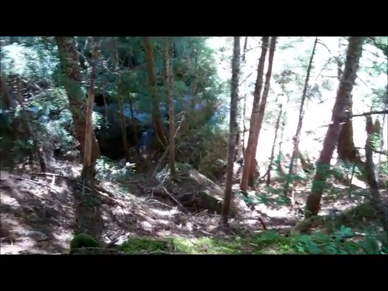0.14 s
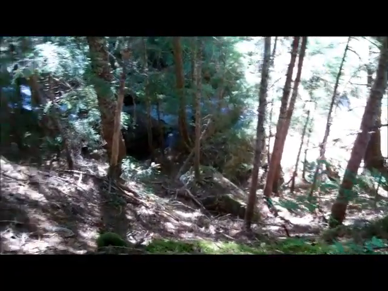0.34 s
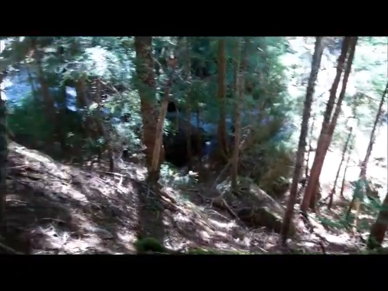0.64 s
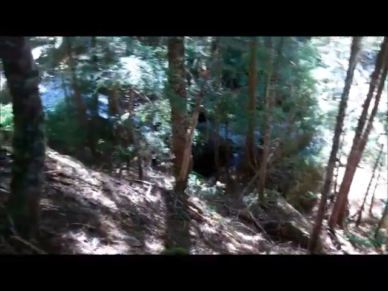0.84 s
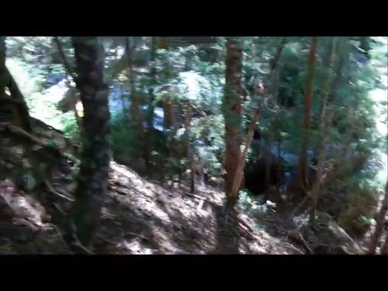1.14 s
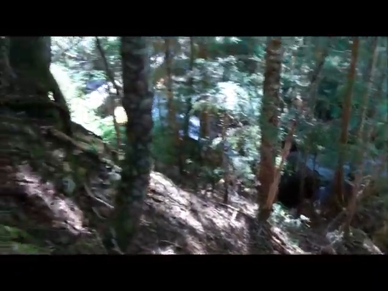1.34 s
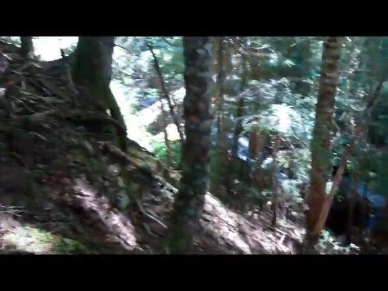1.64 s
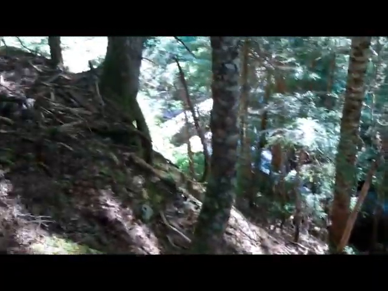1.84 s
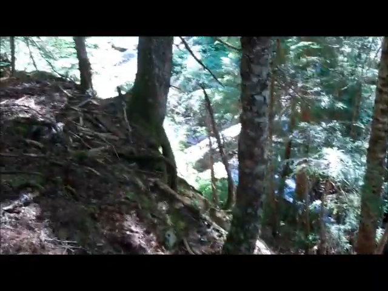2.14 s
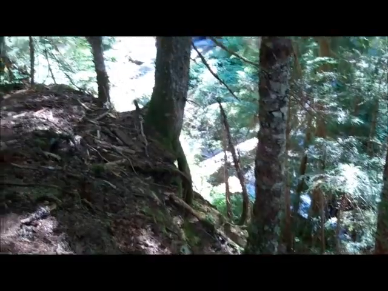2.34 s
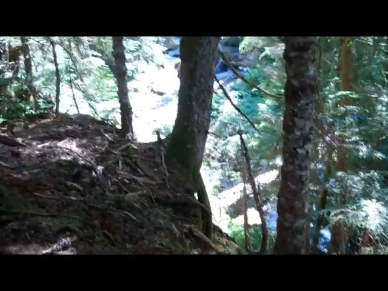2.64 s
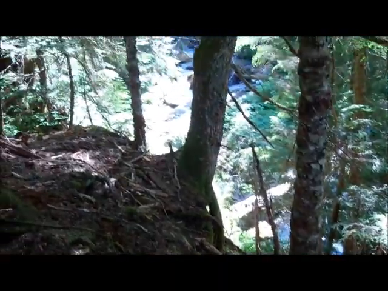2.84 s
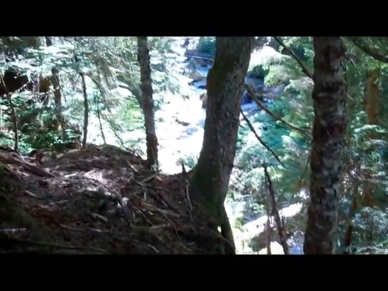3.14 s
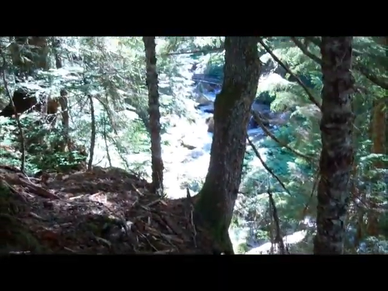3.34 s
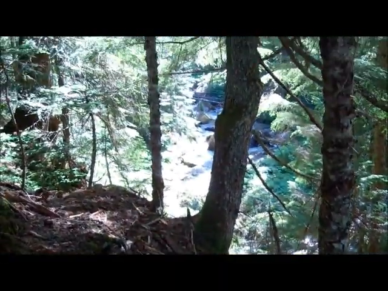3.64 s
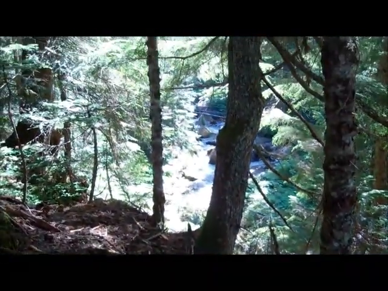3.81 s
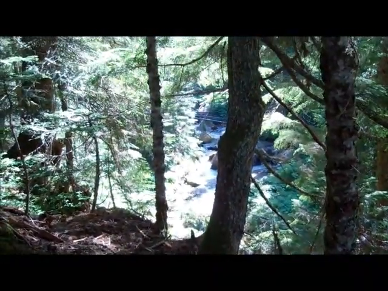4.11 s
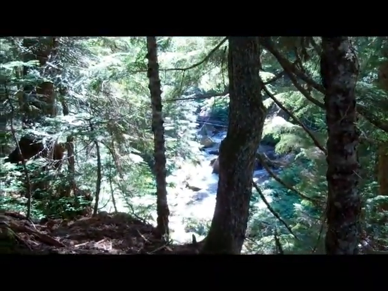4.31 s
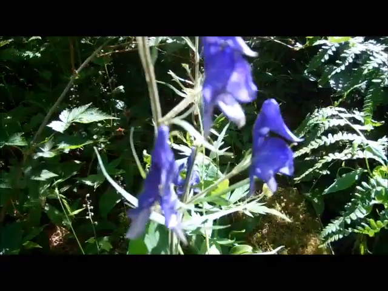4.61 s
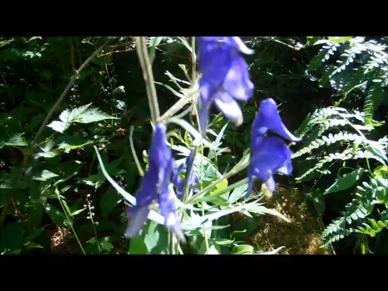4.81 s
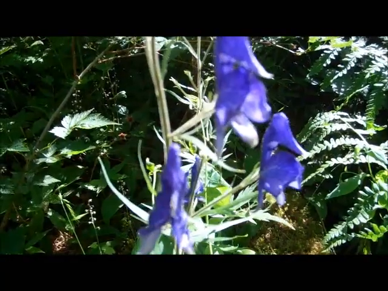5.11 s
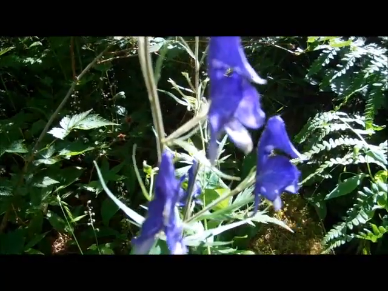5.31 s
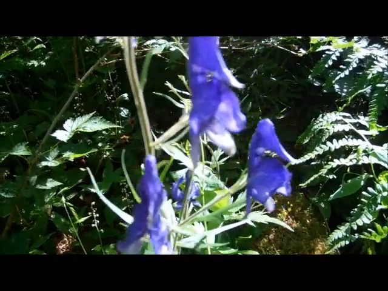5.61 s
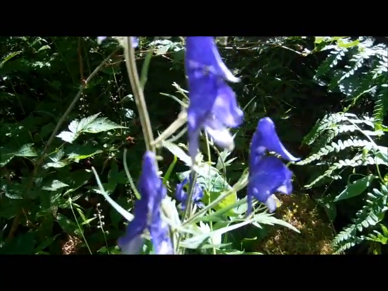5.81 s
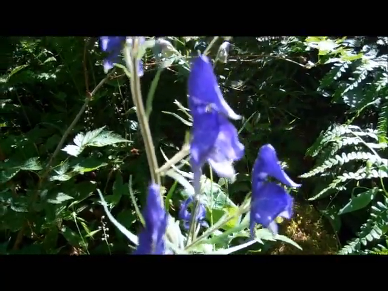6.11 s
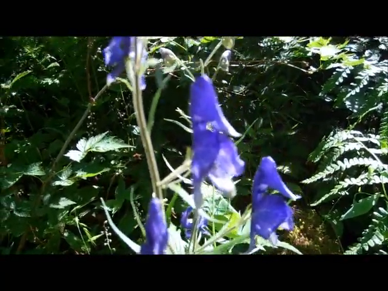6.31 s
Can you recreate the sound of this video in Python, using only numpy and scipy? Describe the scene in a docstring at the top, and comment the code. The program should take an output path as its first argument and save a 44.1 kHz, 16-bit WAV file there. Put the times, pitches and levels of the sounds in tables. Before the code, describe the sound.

A loud mountain stream rushes and gurgles close by, stops after a tiny tick, then returns as a distant, quieter, duller hiss.

```python
"""Mountain stream, near and far

A stream rushes over rocks below a wooded bank, heard on two close microphones as a small camera turns.
Wavering noise bands make the wash; chirping sine rings make its pools, bubbles and crackling spray.
Trees scatter the sound, slight swells of hiss hide within the rush, and air bumps the microphones.
The near shot drops away to silence; a second shot hears the water from far off, quieter and duller.
"""
import sys
import numpy as np
from scipy import signal
from scipy.fft import rfft, irfft
from scipy.io import wavfile
from scipy.ndimage import map_coordinates

SR = 44100
rng = np.random.default_rng(int(sys.argv[2]) if len(sys.argv) > 2 else 0)


def materialize(psi):
    """Save the field psi as 16-bit PCM at rate SR to the path in sys.argv[1].

    A 1-D psi becomes a single channel; in a 2-D psi each row is a channel.
    """
    bounded = np.clip(np.atleast_2d(psi).T, -1, 1)
    quanta = np.round(bounded * 32767).astype(np.int16)
    wavfile.write(sys.argv[1], SR, quanta)


N = 284886
T = np.arange(N) / SR  # seconds
HZ = np.arange(N // 2 + 1) * SR / N + 1e-3  # kept above zero for the logarithms

# Colour of the water from the bank and from far off. Each row: frequency in Hz, relative level in dB per Hz.
NEAR_COLOUR = [(45, -17.5), (90, -8), (150, -9.5), (220, -6.5), (300, -6), (360, -7.5), (480, -1.2),
               (570, -0.05), (700, -2), (920, -3), (1200, -2.5), (1800, -4), (3000, -5.5), (4000, -7),
               (6000, -9.5), (8000, -13), (10000, -16.5), (12000, -28.5), (14000, -41.5)]
FAR_COLOUR = [(25, -4), (70, -0.5), (125, -3), (210, -7), (300, -4), (460, -4), (620, -0.1), (900, -1.8),
              (1100, -0.8), (1400, -2.5), (2500, -3.5), (4000, -5.5), (6000, -10.5), (8000, -16),
              (10000, -21), (12000, -35), (13500, -53)]
# Power that arrives straight from the water. Each row: frequency in Hz, share from 0 to 1.
NEAR_DIRECT = [(100, 0.9), (600, 0.95), (1300, 0.67), (4000, 0.56), (7000, 0.49), (10000, 0.2),
               (13000, 0.04)]
FAR_DIRECT = [(100, 0.13), (2000, 0.25), (4500, 0.16), (7000, .36), (10000, 0.34), (13000, .2)]
# The left microphone port is mostly brighter, most of all near 9 kHz.
# Each row: frequency in Hz, left minus right in dB.
NEAR_BALANCE = [(100, 0.5), (900, 0.6), (2500, 1.6), (5000, 2), (7500, 3.5), (9400, 8.5), (10500, 4.5),
                (12300, 0)]
FAR_BALANCE = [(100, 0.5), (2500, 0.5), (5000, -.4), (7500, 2.7), (9400, 7.5), (10500, 1), (12300, -.3)]
# Change of colour once the camera has turned. Each row: frequency in Hz, change in dB.
TURN_COLOUR = [(100, 0), (165, 1.3), (230, -1), (330, 2), (500, -1.15), (620, 0.66), (900, 0.8), (1200, -1),
               (1700, 0.07), (4000, -0.26), (5700, 1), (8000, -.5), (12000, 0.5)]
# Surging and easing of the white water. Each row: time in seconds, rise in dB.
FLOW = [(0, 1), (.28, 2), (.6, 2), (.73, 2), (.82, 0), (.98, 0), (1.2, 2), (1.62, 2.6), (1.8, 2), (2.0, 2),
        (2.26, .5), (2.7, 1.7), (3.05, 1.7), (3.28, 0), (3.55, 0), (4.03, 2), (4.35, 1.6), (4.6, 1.2)]
# Low churning under the rush. Each row: time in seconds, rise in dB.
CHURN = [(0, 1.5), (.3, -2.5), (.68, .3), (.91, -0.5), (1.04, 2.5), (1.2, -0.5), (1.65, -3.5), (1.82, 0),
         (2.15, 0), (2.4, 0.7), (2.75, -1), (2.88, 1), (3.17, -1), (3.29, -4), (3.42, 2.5), (3.95, -1.5),
         (4.17, 2), (4.3, 0), (4.6, 0)]
# Gulps (+) and lulls (-) of the near and the far pools. Each row: middle in seconds, rise in dB.
NEAR_GULPS = [(.07, -2.5), (.3, 3.5), (.45, 2.5), (.58, 4.5), (1.72, 2), (1.98, 1), (2.23, -5), (2.75, -4),
              (3.0, 2), (3.33, 0.5), (3.72, 3), (3.81, -5), (4.03, 1.5)]
FAR_GULPS = [(4.85, 1), (5.0, 1), (5.1, -1), (5.27, 0), (5.39, -0.5), (5.53, 2.2), (5.72, -1.8), (6.0, -.8)]
# Slight swells of hiss within the rush. Each row: peak in seconds, level in dB, centre in Hz.
HISS_SWELLS = [(.114, -41, 2300), (.407, -42, 2500), (1.215, -40.5, 2500), (1.654, -37, 2400),
               (1.986, -37, 1500), (3.268, -41, 2400)]
# Air bumping the microphones. Each row: middle in seconds, level at the right port in dB,
# half-width in seconds.
PUFFS = [(0.072, -37.5, 0.026), (0.697, -49, 0.046), (1.03, -44, 0.06)]
# Colour of that air. Each row: frequency in Hz, relative level in dB per Hz.
PUFF_COLOUR = [(20, 1), (60, 0), (125, 2), (240, -15), (500, -30), (2000, -80)]
# How the near shot falls away. Each row: start in seconds, step down in dB, further fall in dB per second.
DROPS = [(4.589, 5.5, 108), (4.645, 17, 601)]

NEAR_DB, FAR_DB = -32.5, -45  # base level of the stream in each shot
SILENT_S, SECOND_SHOT_S = 4.68, 4.7015
# Lag of the left port behind the right; the turn moves it steadily
LAG_BEFORE_MS, LAG_AFTER_MS, FAR_LAG_MS = -0.024, 0.037, 0.099
TURN_START_S, TURN_END_S = 0.32, 2.13
SHIFT_START_S, SHIFT_END_S = 1.3, 2.9  # slow shift of colour
PORT_GAP_M, SOUND_M_PER_S = 0.037, 343
CHURN_HZ, POOLS_HZ, FAR_POOLS_HZ = 240, 550, 850
POOLS_DRIFT_OCTAVES, POOLS_DRIFT_PER_S = 0.17, 7  # the gurgle wanders in pitch
GURGLE_DB, GURGLE_WANDER_DB, GURGLE_PER_S, SPRAY_DB = 2.13, 0.14, 6.5, 0.8
POOLS_LAG, SPRAY_LAG = 0.79, 0.31  # dB by which each falls behind per dB of surge
GULP_HALF_S = 0.025
CLUSTER_DB, CLUSTERS_PER_S = 1.23, 22  # bubbles come in clusters
BUBBLE_ATTACK_CYCLES = 0.6
HISS_RISE_S, HISS_OCTAVES = 0.0048, 1.2
DRAUGHT_DB, PUFF_LEFT_DB = -63, -17  # faint eddies between puffs; the left port is sheltered
THUMP_S, THUMP_DB, THUMP_HZ, THUMP_HALF_S = 0.078, -35.5, 121, 0.0088
CLICK_S, CLICK_DB, CLICK_HZ, CLICK_HALF_S = 4.5866, -16.5, 2700, 0.00024
RUMBLE_CUT_HZ, TOP_HZ = 18, 14000


def undb(db):
    """Decibels to gain."""
    return 10 ** (np.asarray(db) / 20)


def across(points):
    """Table values joined by straight lines on a log-frequency axis."""
    hz, value = np.transpose(points)
    return np.interp(np.log(HZ), np.log(hz), value)


def over_time(points):
    """Table values joined by straight lines in time."""
    return np.interp(T, *np.transpose(points))


def octave_bell(centre_hz, octaves, hz=HZ):
    """A bell curve on a log-frequency axis, 1 at its centre."""
    return np.exp(-(np.log2(hz / centre_hz) / octaves) ** 2)


def time_bell(age, half_s):
    """A bell curve in time, 1 at age zero."""
    return np.exp(-0.5 * (age / half_s) ** 2)


def walk(rate):
    """Random levels, rate of them per second, joined by straight lines."""
    knots = rng.standard_normal(1024)
    return 0.92 * np.interp(T * rate, np.arange(len(knots)), knots)


def gulps(table):
    """Level of the pools in dB: each gulp or lull comes and goes like a bell curve."""
    return sum(rise_db * time_bell(T - s, GULP_HALF_S) for s, rise_db in table)


def wash(surge_db, flicker_db, churn_db, gurgle_db, gurgle_hz, spray_db):
    """Three unrelated noises for countless bubbles; octave bands waver together and flicker alone."""
    white = rfft(rng.standard_normal((3, N)))
    centres = 125 * 2.0 ** np.arange(8)
    surge = surge_db * (walk(9) + 0.64 * walk(27.9))
    out = 0
    for hz, pick in zip(centres, np.eye(len(centres))):
        # neighbouring bands crossfade
        band = irfft(white * np.interp(np.log(HZ), np.log(centres), pick), N)
        churn = octave_bell(CHURN_HZ, 0.7, hz) * churn_db
        gurgle = octave_bell(gurgle_hz, 0.85, hz) * gurgle_db
        spray = np.clip(np.log2(hz / 1200) / 2, 0, 1) * spray_db
        out = out + band * undb(surge + flicker_db * walk(16) + churn + gurgle + spray)
    return out


def bubbles(low_hz, high_hz, cycles, spread_db, glide, count, size):
    """Short rings, soft at the start, that rise in pitch at random moments; loud ones are few. Rms 1."""
    when, pitch, loud = rng.random((count, 3)).T[:, :, None]
    hz = low_hz + (high_hz - low_hz) * pitch
    turns = hz * np.arange(size) / SR
    age = np.minimum(turns / cycles, 1)
    rarity = np.maximum(loud, 1 / count ** 0.94)  # the floor limits the loudest
    strength = undb(-spread_db * np.log(rarity)) * np.sqrt(hz)
    attack = 1 - np.exp(-turns / BUBBLE_ATTACK_CYCLES)
    decay = np.exp(-np.log(100) * age) * (1 - age)
    rings = strength * attack * decay * np.sin(2 * np.pi * turns * (1 + glide * age / 2))
    places = (when * N).astype(int) + np.arange(size)
    out = np.bincount(places.ravel(), rings.ravel(), N)[:N]
    return out / out.std()


def microphones(water, colour, direct, lag_ms, balance, unlike):
    """Two close ports: straight sound lags at the left; sound off the trees is most alike in the bass."""
    straight, around, between = water
    late = map_coordinates(straight, [np.arange(N) - lag_ms * SR / 1000], order=5, mode="nearest")
    # likeness of sound that comes from all directions
    alike = (1 - unlike) * np.sinc(2 * HZ * PORT_GAP_M / SOUND_M_PER_S)
    sides = np.array([[1], [-1]])  # left, right
    common = rfft(around) * np.sqrt((1 + alike) / 2)
    opposed = rfft(between) * np.sqrt((1 - alike) / 2)
    scattered = common + sides * opposed
    share = across(direct)
    mixed = np.sqrt(share) * rfft([late, straight]) + np.sqrt(1 - share) * scattered
    gain = undb(across(colour))
    gain = gain / np.sqrt(np.mean(gain ** 2)) * undb(sides * across(balance) / 2)
    return irfft(gain * mixed, N)


def far_stream():
    """Through the forest the grains have blurred into a steady hiss with a faint burble."""
    gurgle_db = gulps(FAR_GULPS) + 0.28 * walk(9.6)
    straight, around, between = wash(
        surge_db=0.0, flicker_db=0.33, churn_db=0.4 * walk(4),
        gurgle_db=gurgle_db, gurgle_hz=FAR_POOLS_HZ, spray_db=0.15 * walk(3.1))
    burble = undb(-21) * bubbles(820, 1470, cycles=22, spread_db=1.0, glide=0.1, count=800, size=1400)
    water = [straight + burble, around, between]
    heard = microphones(water, FAR_COLOUR, FAR_DIRECT, FAR_LAG_MS, FAR_BALANCE, unlike=0.23)
    return heard * undb(FAR_DB)


def puffs():
    """Low eddies of air, unrelated at the two ports and stronger on the right."""
    eddies = irfft(rfft(rng.standard_normal((2, N))) * undb(across(PUFF_COLOUR)), N)
    bumps = sum(undb(db) * time_bell(T - s, half_s) for s, db, half_s in PUFFS)
    swell = undb(DRAUGHT_DB) + bumps
    return eddies / eddies.std() * swell * undb([[PUFF_LEFT_DB], [0]])


def thump():
    """A soft, low bump, as of a hand shifting on the camera: a sine under a bell curve."""
    age = T - THUMP_S
    return undb(THUMP_DB) * time_bell(age, THUMP_HALF_S) * np.sin(2 * np.pi * THUMP_HZ * age)


def click():
    """One dry tick just as the near shot begins to fall away: a very short sine burst."""
    age = T - CLICK_S
    return undb(CLICK_DB) * time_bell(age, CLICK_HALF_S) * np.sin(2 * np.pi * CLICK_HZ * age)


def hiss_swells():
    """Slight, brief swells of noise around one pitch, hardly heard apart from the rush."""
    out = 0
    for s, db, hz in HISS_SWELLS:
        hiss = irfft(rfft(rng.standard_normal(N)) * octave_bell(hz, HISS_OCTAVES), N)
        age = np.maximum(T - s + HISS_RISE_S, 0) / HISS_RISE_S
        out = out + undb(db) * hiss / hiss.std() * age * np.exp(1 - age)
    return out


def shift_colour(heard):
    """The colour shifts slowly as the camera turns, as when the ground's reflection moves."""
    turned = irfft(rfft(heard) * undb(across(TURN_COLOUR)), N)
    return heard + (turned - heard) * np.interp(T, [SHIFT_START_S, SHIFT_END_S], [0, 1])


def near_stream():
    """White water below the bank: a surging wash, gulping pools, clustered bubbles and bursting spray."""
    rise_db = over_time(FLOW)
    wander_db = GURGLE_WANDER_DB * walk(GURGLE_PER_S)
    gurgle_db = GURGLE_DB + gulps(NEAR_GULPS) + wander_db - POOLS_LAG * rise_db
    gurgle_hz = POOLS_HZ * 2 ** (POOLS_DRIFT_OCTAVES * walk(POOLS_DRIFT_PER_S))
    spray_db = SPRAY_DB - SPRAY_LAG * rise_db
    straight, around, between = wash(
        surge_db=0.17, flicker_db=0.6, churn_db=over_time(CHURN),
        gurgle_db=gurgle_db, gurgle_hz=gurgle_hz, spray_db=spray_db)
    pools = bubbles(385, 1290, cycles=17.5, spread_db=0.7, glide=0.17, count=1000, size=2000)
    rapids = bubbles(895, 4660, cycles=14.0, spread_db=1.0, glide=0.24, count=6000, size=500)
    spray = bubbles(3220, 13600, cycles=6.3, spread_db=2.0, glide=0.091, count=16000, size=120)
    clusters = undb(CLUSTER_DB * walk(CLUSTERS_PER_S))
    clustered = (undb(-21.5) * pools + undb(-13.0) * rapids) * clusters
    # single bubbles are added only to the straight sound
    straight = undb(-0.37) * straight + clustered + undb(-8.0) * spray * undb(spray_db)
    water = [straight, around, between]
    lag_ms = np.interp(T, [TURN_START_S, TURN_END_S], [LAG_BEFORE_MS, LAG_AFTER_MS])
    heard = microphones(water, NEAR_COLOUR, NEAR_DIRECT, lag_ms, NEAR_BALANCE, unlike=0.4)
    return shift_colour(heard) * undb(NEAR_DB + rise_db) + hiss_swells()


def fade():
    """Gain of the near shot: at each drop it steps down and keeps falling, until it is silent."""
    fall_db = sum((T > s) * (step_db + slope * (T - s)) for s, step_db, slope in DROPS)
    return undb(-fall_db) * (T < SILENT_S)


def scene():
    """The near shot, a blink of silence, the far shot."""
    near_shot = (near_stream() + puffs() + thump()) * fade() + click()
    far_shot = far_stream() * (T > SECOND_SHOT_S)
    return near_shot + far_shot


def record(dry):
    """The camera thins the deepest rumble and cuts the top steeply."""
    rumble_cut = signal.butter(2, RUMBLE_CUT_HZ, "highpass", fs=SR, output="sos")
    top_cut = signal.ellip(10, 0.1, 70, TOP_HZ, fs=SR, output="sos")
    return signal.sosfilt(top_cut, signal.sosfilt(rumble_cut, dry))


dry = scene()
out = record(dry)
materialize(out)
```